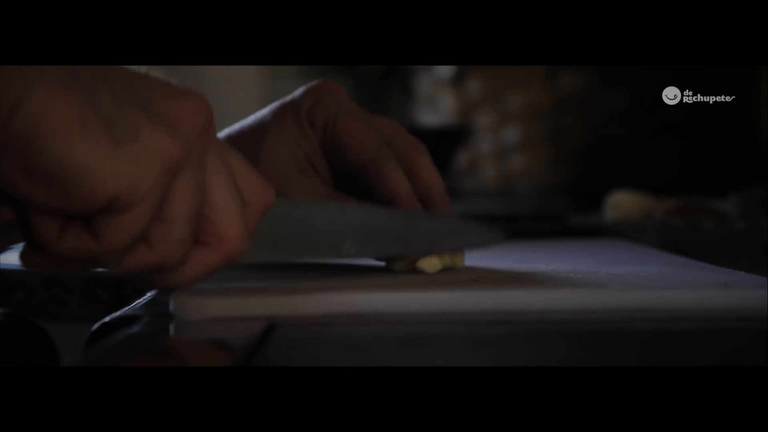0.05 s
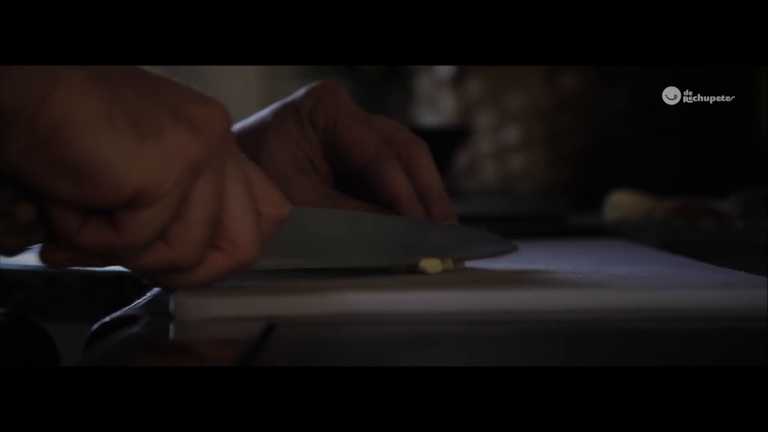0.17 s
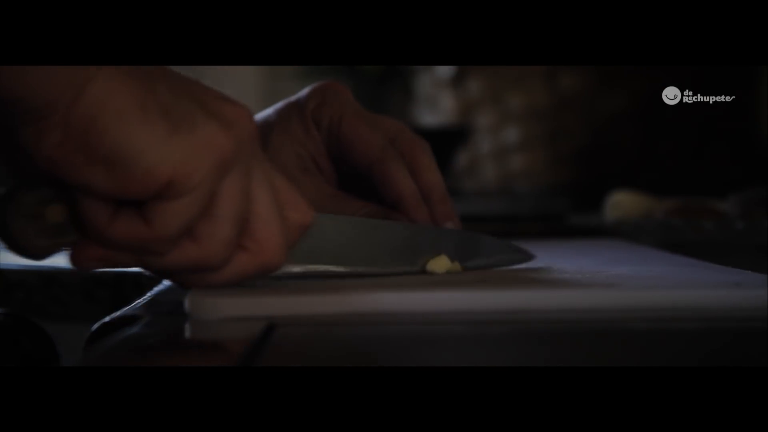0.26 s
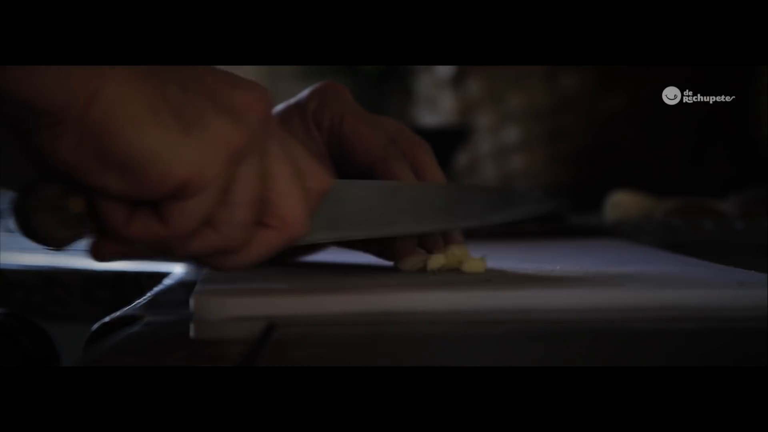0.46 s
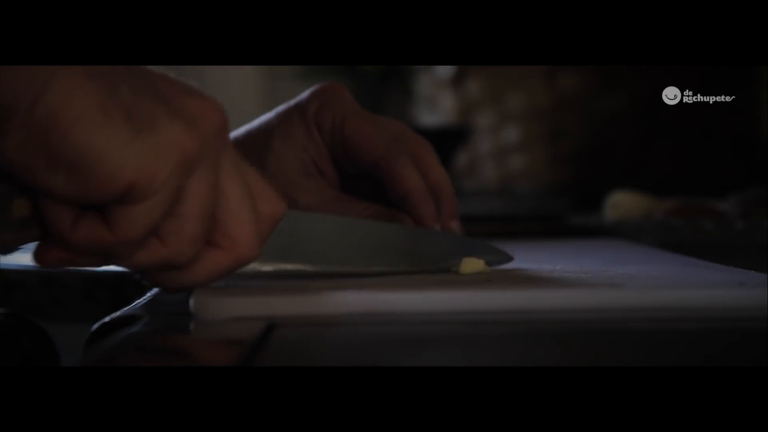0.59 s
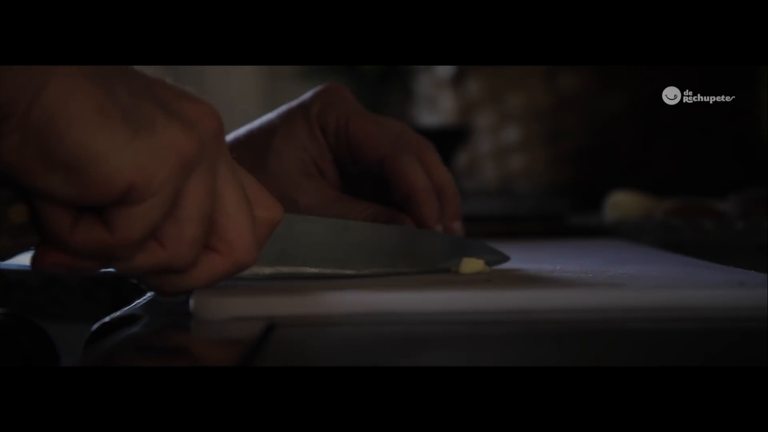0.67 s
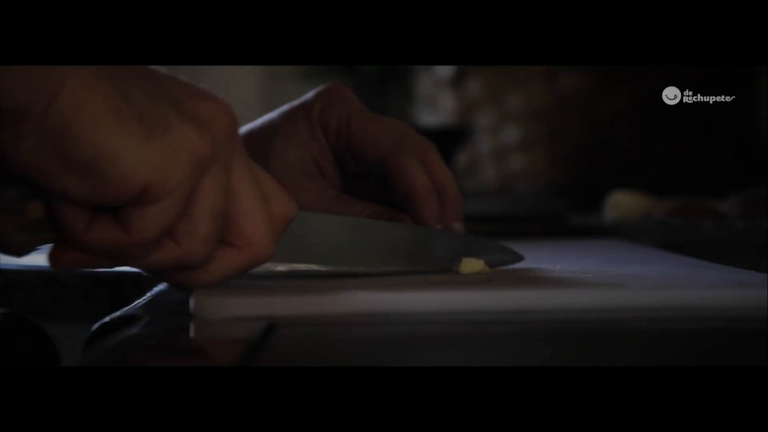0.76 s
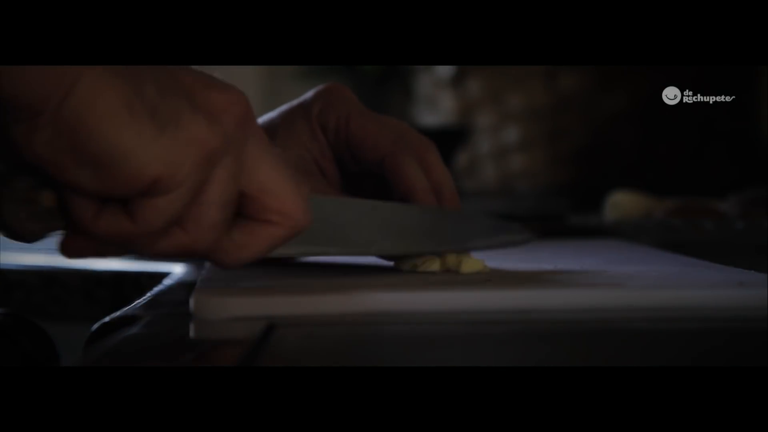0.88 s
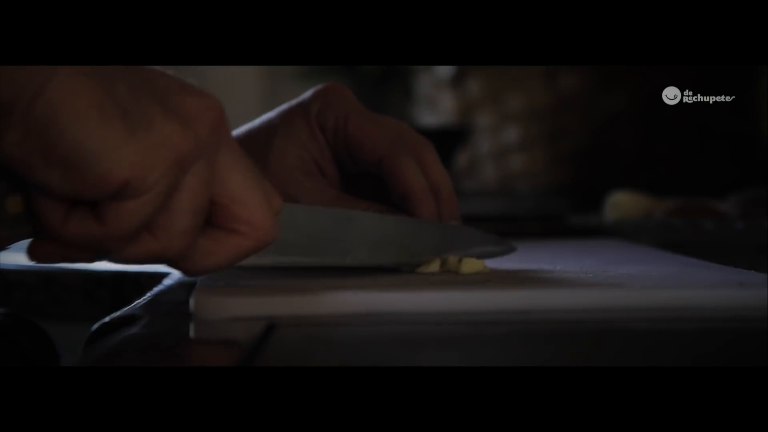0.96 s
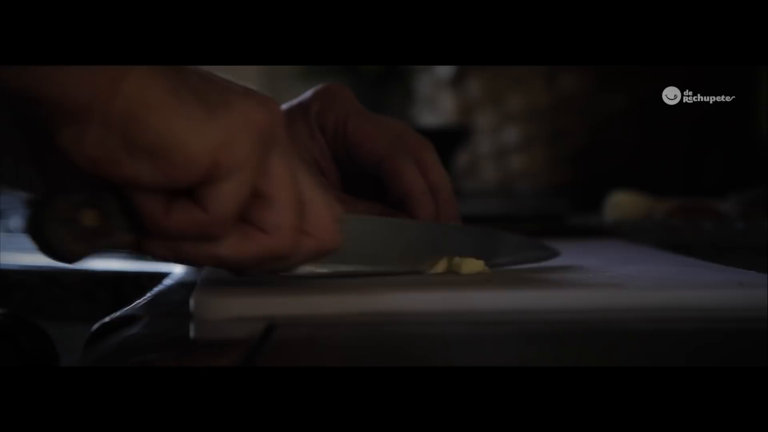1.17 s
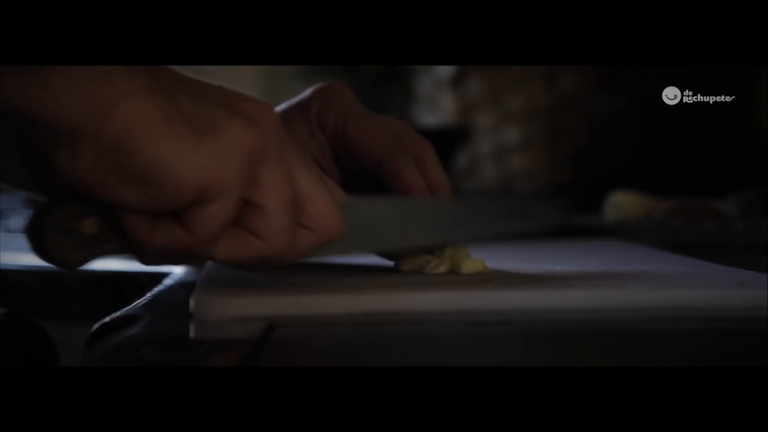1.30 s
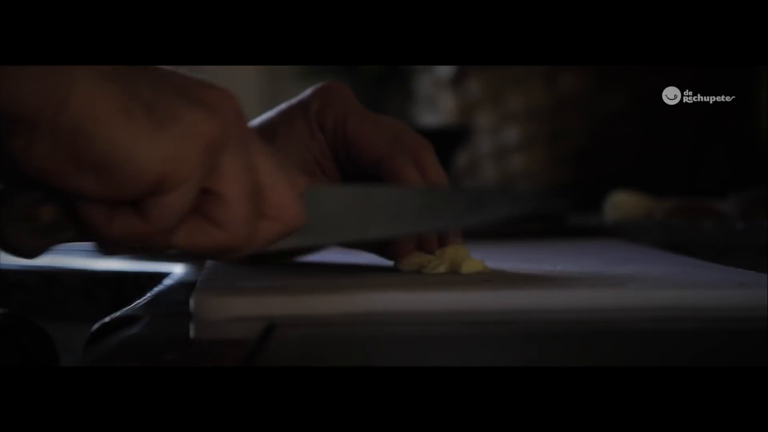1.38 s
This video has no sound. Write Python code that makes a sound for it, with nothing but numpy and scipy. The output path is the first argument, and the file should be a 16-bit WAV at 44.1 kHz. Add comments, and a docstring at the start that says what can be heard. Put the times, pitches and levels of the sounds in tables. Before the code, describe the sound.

Knife chops on a plastic cutting board: three sharp, uneven knocks in a small live kitchen.

```python
"""A blade drags lightly on a plastic board in faint room tone; then a chef's knife slices mushrooms: three strokes.
Friction of the edge in the flesh is grainy noise that hisses; edge and heel then knock on the board within
milliseconds, exciting damped modes of board and blade and a short noise crack.
Between strokes the blade taps and scrapes and the board bumps. A small, live kitchen adds dense reverberation
to blade and board; only the room tone has width, and the recorder rounds off the highest peaks."""
import sys
import numpy as np
from scipy import signal
from scipy.fft import rfft, irfft, next_fast_len
from scipy.io import wavfile
from scipy.ndimage import uniform_filter1d

SR = 44100
rng = np.random.default_rng(int(sys.argv[2]) if len(sys.argv) > 2 else 0)


def to_wav(sig):
    """Store sig (one row per channel, or 1-D mono) as 16-bit WAV at the path in sys.argv[1].

    Samples outside -1..1 are clipped; the rate is SR.
    """
    pcm = np.clip(np.atleast_2d(sig), -1, 1) * 32767
    pcm = np.round(pcm).astype(np.int16)
    wavfile.write(sys.argv[1], SR, pcm.T)  # frames by channels


N = 63945  # length [samples]


def amp(db):
    """Level law: an amplitude ratio is 10 to the power dB / 20."""
    return 10 ** (np.asarray(db) / 20)


def unit(x):
    """Normalisation: scale to an rms of 1."""
    return x / np.sqrt(np.mean(x ** 2) + 1e-20)


def along(points, hz):
    """Logarithmic pitch scale: interpolate (frequency [Hz], value) points on a log axis."""
    point_hz, values = np.transpose(points)
    return np.interp(np.log(hz + 1), np.log(point_hz + 1), values)


def filtered(x, response):
    """Linear filtering: multiply the spectrum by a response of frequency."""
    size = x.shape[-1]
    padded = next_fast_len(size + SR // 4)
    spectrum = rfft(x, padded) * response(np.fft.rfftfreq(padded, 1 / SR))
    return irfft(spectrum, padded)[..., :size]


def noise(spectrum, size):
    """Spectral shaping: white noise coloured by a (frequency [Hz], level [dB]) curve, rms 1."""
    white = rng.standard_normal(size)
    return unit(filtered(white, lambda hz: amp(along(spectrum, hz))))


def fade(t, t60):
    """Exponential damping: the level falls 60 dB in t60 seconds."""
    return np.exp(-np.log(1000) * t / t60)


def add(track, s, sound):
    """Superposition: mix a sound into the track at time s."""
    part = track[max(0, round(s * SR)):][:len(sound)]
    part += sound[:len(part)]


SCATTER_DB = 0.7  # random spread of each mode's level, standard deviation


def ring(modes, t, attack_s, place):
    """Modal superposition: the place of the blow (0-1) decides how strongly each damped mode is driven."""
    tones = np.zeros(len(t))
    for k, (hz, db, t60) in enumerate(modes, 1):
        level = amp(db + SCATTER_DB * rng.standard_normal())
        drive = np.sin(np.pi * k * place)
        tones += level * drive * fade(t, t60) * np.sin(2 * np.pi * hz * t)
    return tones * (1 - np.exp(-t / attack_s))


GRAIN_DB = 2.5  # rms depth of the grain


def rubbing(rows, spectrum):
    """Friction noise: grainy, it swells by 20 dB over each rise and drops by 20 dB over each fall."""
    t = np.arange(N) / SR
    level = np.zeros(N)
    for s, rise, fall, db in rows:
        distance = np.maximum((s - t) / rise, (t - s) / fall)
        level += amp(db - 20 * distance)
    slow_noise = unit(uniform_filter1d(rng.standard_normal(N), size=40))
    grains = amp(GRAIN_DB * slow_noise)
    return level * unit(grains * noise(spectrum, size=N))


# spectrum of the room tone: (frequency [Hz], level [dB])
AIR = [(20, -5), (50, -2.5), (72, 5), (100, 3), (200, -2), (420, 3), (580, 4.5), (850, -3), (1150, -6.5),
       (2000, -8.5), (4000, -14), (9000, -16.5), (15500, -18.5)]
# width of the room tone: (frequency [Hz], side over mid [dB])
AIR_SIDE = [(30, 0), (70, -21), (140, -12.5), (500, -19.5), (2000, -9.5), (8000, -4.5), (15000, -4)]
AIR_DB = -52.5  # rms level of the mid signal


def room_tone():
    """Mid-side decomposition: faint steady noise, wide in the deep bass."""
    mid = noise(AIR, size=N)
    side = filtered(noise(AIR, size=N), lambda hz: amp(along(AIR_SIDE, hz)))
    return amp(AIR_DB) * np.array([mid + side, mid - side])


# the blade dragging on the board: (time of peak [s], rise [s], fall [s], level [dB])
DRAGS = [(.004, 0.012, 0.051, -40.5), (1.015, 0.045, 0.047, -54)]
# spectrum of a drag: (frequency [Hz], level [dB])
DRAG = [(150, 3.5), (400, -19), (800, -7), (1050, 4.5), (1500, -19), (2500, -9.5), (4000, -28),
        (12000, -48)]


def drags():
    """Sliding friction: the blade drags lightly along the board."""
    return rubbing(DRAGS, DRAG)


# dull bumps of the board on the counter: (time [s], level [dB])
BUMPS = [(0.121, -37), (0.406, -38), (0.861, -32.5)]
# modes of a bump: (frequency [Hz], level [dB], t60 [s])
BUMP = [(224, -4.5, 0.16), (283, -0.5, 0.041), (410, -4, .04)]


def bumps():
    """Soft impact: the board rocks on the counter, and a slow attack keeps its low modes dull."""
    out, t = np.zeros(N), np.arange(SR // 4) / SR
    for s, db in BUMPS:
        add(out, s, amp(db) * ring(BUMP, t, attack_s=0.0037, place=0.75))
    return out


# the edge passing through the flesh: (time of peak [s], rise [s], fall [s], level [dB])
CUTS = [(.228, 0.1, 0.032, -42.5), (.246, 0.0073, 0.018, -22.5), (.628, 0.093, 0.082, -51),
        (.85, 0.078, .05, -52), (1.03, 0.07, 0.027, -48), (1.159, .07, 0.0038, -43),
        (1.215, 0.062, 0.075, -40)]
# spectrum of the flesh: (frequency [Hz], level [dB])
FLESH = [(200, -3), (600, 1), (2000, 1), (4000, -6), (8500, -6), (15000, -16)]


def cuts():
    """Cutting friction: the edge hisses through the flesh."""
    return rubbing(CUTS, FLESH)


# modes of the plastic board: (frequency [Hz], level [dB], t60 [s])
BOARD = [(230.2, -10.5, 0.085), (290.4, -10.5, 0.1), (486.7, -7, 0.037), (584, -0.5, 0.036),
         (676, -2, 0.058), (751, -3.5, 0.033), (939, 1, 0.038), (1056, -11.5, 0.1)]
# modes of the hand-damped blade: (frequency [Hz], level [dB], t60 [s])
BLADE = [(999, -7.5, 0.16), (1167, -20, 0.12), (1358.7, -2, 0.071), (1455, -2, 0.031), (1782, -11, 0.057),
         (1873, -5, 0.071), (2130, 0, 0.049), (2229, -4.5, 0.037), (2830, 0, 0.026), (2991, -7, 0.037),
         (3500, -9, 0.034), (5130, -6.5, 0.016), (5814, -13, 0.055), (7100, -18.5, 0.081)]
# spectrum of the contact crack: (frequency [Hz], level [dB])
CRACK = [(100, -45), (250, -12.5), (400, -9.5), (700, -3), (2500, 0.5), (4000, -3.5), (6500, -2.5),
         (10000, -9), (16000, -8.5)]
CRACK_T60_S, CRACK_ATTACK_S, MODE_ATTACK_S = 0.018, 0.0001, 0.00035  # attacks are time constants


def knocks(rows):
    """Impact excitation: each contact rings board and blade and gives a short crack with its own treble corner."""
    out, t = np.zeros(N), np.arange(SR // 2) / SR
    for s, board_db, blade_db, crack_db, corner_hz, place in rows:
        crack = filtered(noise(CRACK, size=len(t)), lambda hz: 1 / np.hypot(1, (hz / corner_hz) ** 2))
        crack = unit(crack) * fade(t, CRACK_T60_S) * (1 - np.exp(-t / CRACK_ATTACK_S))
        board = ring(BOARD, t, MODE_ATTACK_S, place)
        blade = ring(BLADE, t, MODE_ATTACK_S, place)
        add(out, s, amp(board_db) * board + amp(blade_db) * blade + amp(crack_db) * crack)
    return out


# light taps of the blade: (time [s], board level [dB], blade level [dB], crack level [dB],
# crack corner [Hz], place along the edge [0-1])
TAPS = [(.407, -44, -35, -32, 2300, .68), (.2412, -63, -60, -31, 14000, 0.1)]


def taps():
    """Weak impact: the blade lightly taps the board."""
    return knocks(TAPS)


# contacts of blade and board, three to a stroke: (time [s], board level [dB], blade level [dB],
# crack level [dB], crack corner [Hz], place along the edge [0-1])
CONTACTS = [(.24938, -7.5, -8, -2.5, 6500, 0.55), (.25214, -12.5, -14.5, -9, 9700, .23),
            (.25679, -32, -12, -14, 7000, 0.69), (.64978, -25.5, -18, -10.5, 1510, 0.32),
            (.65146, -14.5, -17, -13.5, 10600, 0.72), (.65641, -20.5, -20, -13.5, 2600, 0.63),
            (1.16096, -21, -20, -16.5, 14020, .95), (1.1638, -21.5, -27.5, -22.5, 12000, 0.56),
            (1.16785, -27, -25.5, -23.5, 11100, .29)]


def strokes():
    """Multiple impact: parts of the edge strike the board within a few milliseconds of each other."""
    return knocks(CONTACTS)


# the edge scraping sideways as a slice is pushed off: (time of peak [s], rise [s], fall [s], level [dB])
SCRAPES = [(.408, 0.023, 0.024, -28), (.861, 0.026, 0.0083, -46.5), (1.121, 0.0072, 0.025, -52.5)]
# spectrum of a scrape: (frequency [Hz], level [dB])
SCRAPE = [(200, -9), (700, -4.5), (1600, 3.5), (2100, -0.5), (2600, 5), (3600, -18), (8000, -16.5),
          (14000, -41)]


def scrapes():
    """Sideways friction: the edge scrapes across the board."""
    return rubbing(SCRAPES, SCRAPE)


# reverberation time of the kitchen: (frequency [Hz], t60 [s])
ROOM_T60 = [(150, 0.76), (400, 0.4), (1050, 0.44), (2800, 0.41), (7000, 0.35), (14000, 0.27)]
ROOM_DB, WALLS_DB, WALLS_T60_S = -7, -9, 0.058  # energies of tail and walls, before the room's colour


def room_answer():
    """Impulse response: sparse, fast-fading wall echoes over a diffuse tail whose decay varies with frequency."""
    t = np.arange(SR // 2) / SR
    hz, frames, z = signal.stft(rng.standard_normal(len(t)), SR, nperseg=256)
    decaying = z * fade(frames, along(ROOM_T60, hz)[:, None])
    tail = signal.istft(decaying, SR, nperseg=256)[1][:len(t)]
    echoes = rng.random(len(t)) < 900 / SR  # about 900 per second
    walls = rng.standard_normal(len(t)) * echoes * fade(t, WALLS_T60_S)
    return amp(ROOM_DB) * tail / np.linalg.norm(tail) + amp(WALLS_DB) * walls / np.linalg.norm(walls)


# colour of the reverberation: (frequency [Hz], level [dB])
ROOM_COLOUR = [(100, -10.5), (250, -6), (650, -2.5), (850, -3.5), (1060, 6), (1330, 1), (1700, -3.5),
               (2600, -2), (6000, 0), (10000, -3), (15000, -7.5)]
ROOM_DELAY_S, SLICE_S = 0.009, 0.0012  # delay of the answer; step from one scattering path to the next


def kitchen(x, count=6):
    """Diffuse scattering: successive moments take different paths, so the reverberation is dense and smooth."""
    turn = np.arange(N) / SR / SLICE_S
    out = np.zeros(N)
    for k in range(count):
        # overlapping sine windows, two slices long, hand the sound from path to path
        share = np.sin(np.pi / 2 * np.minimum((turn - k) % count, 2))
        add(out, ROOM_DELAY_S, signal.fftconvolve(x * share, room_answer()))
    return filtered(out, lambda hz: amp(along(ROOM_COLOUR, hz)))


LOW_CUT_HZ = 197


def low_cut(x):
    """Radiation efficiency: the small board radiates little bass."""
    sections = signal.butter(N=4, Wn=LOW_CUT_HZ, btype="high", fs=SR, output="sos")
    return signal.sosfilt(sections, x)


def scene():
    """Superposition of sources: knife and board in the middle of the kitchen, with wide, faint air."""
    friction = drags() + cuts() + scrapes()
    knife = friction + taps() + strokes()
    return low_cut(knife + kitchen(knife)) + bumps() + room_tone()


# constant offset of the recorder, a row for each channel: (offset [full scale])
DC_OFFSET = [
    [-.029],
    [-.006],
]
CLIP_LEVEL, TOP_HZ = 1.0, 15900  # ceiling of the rounded peaks [full scale]; band limit


def record(dry):
    """Saturation and band limiting: peaks are rounded, the top band is removed and the signal sits off zero."""
    clipped = dry / (1 + np.abs(dry / CLIP_LEVEL) ** 8) ** (1 / 8)
    return filtered(clipped, lambda hz: hz < TOP_HZ) + np.array(DC_OFFSET)


dry = scene()
out = record(dry)
to_wav(out)
```